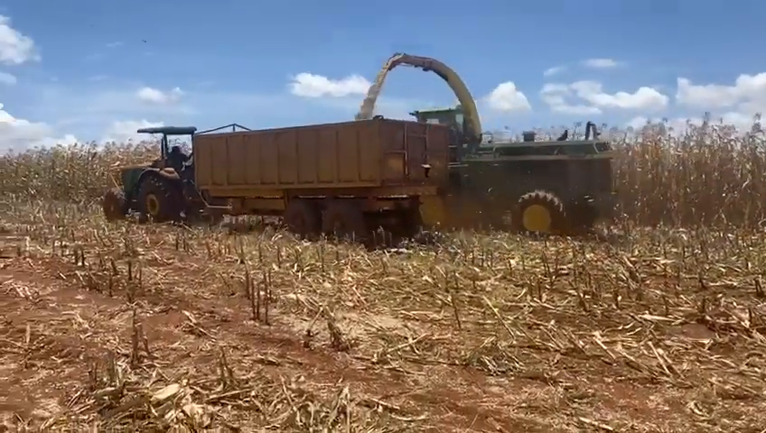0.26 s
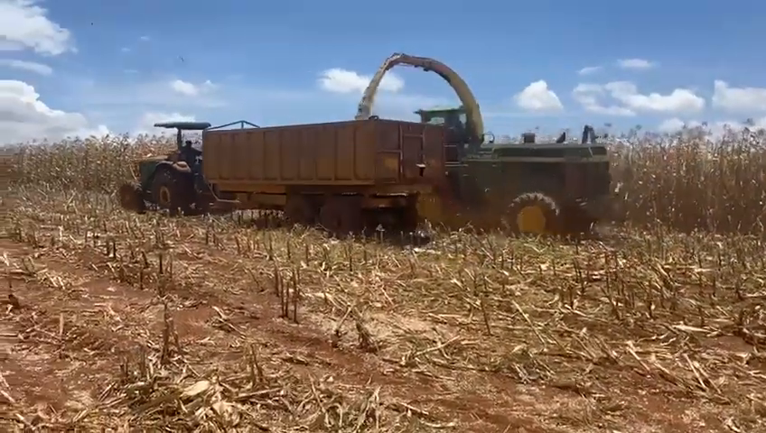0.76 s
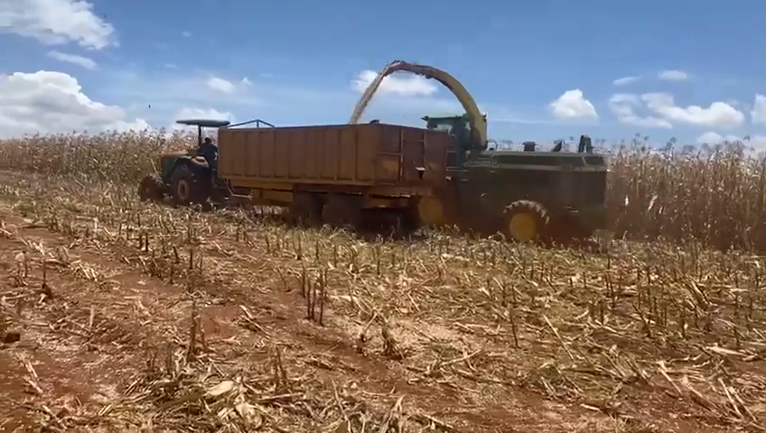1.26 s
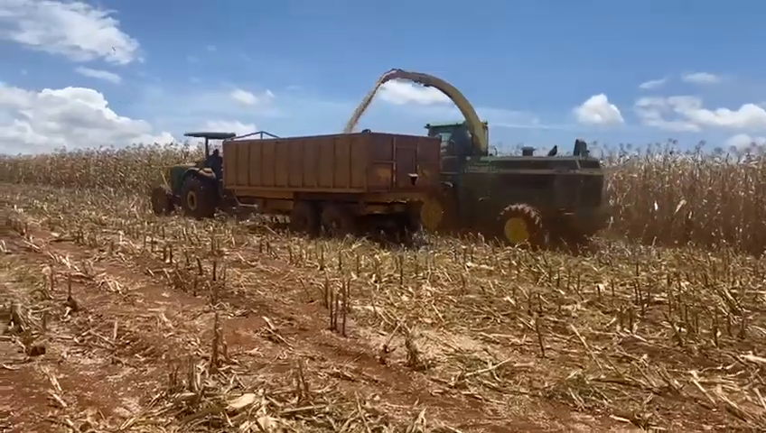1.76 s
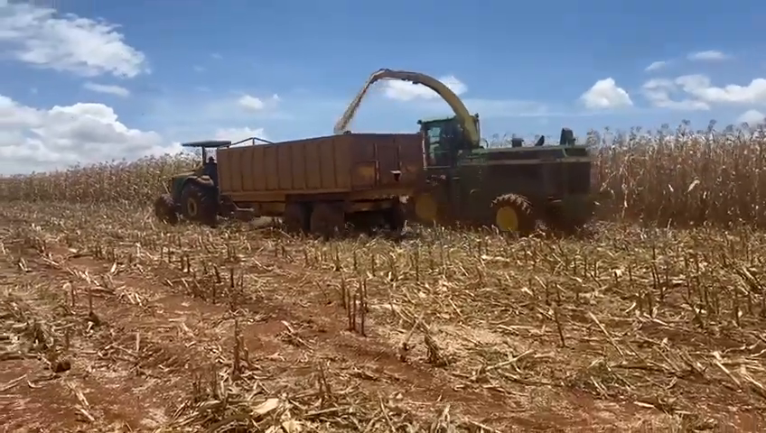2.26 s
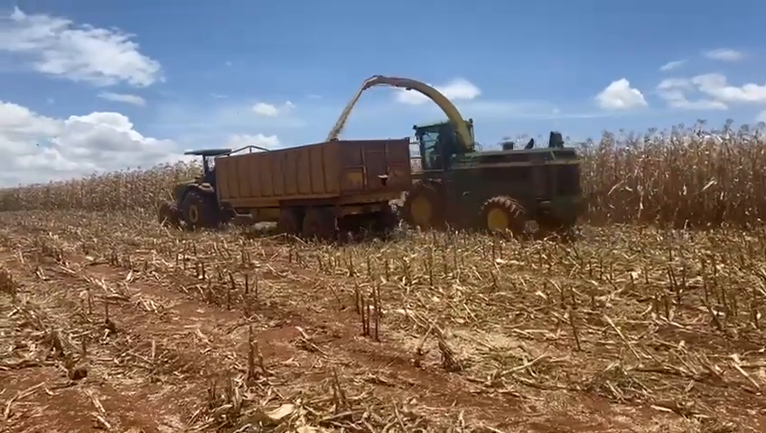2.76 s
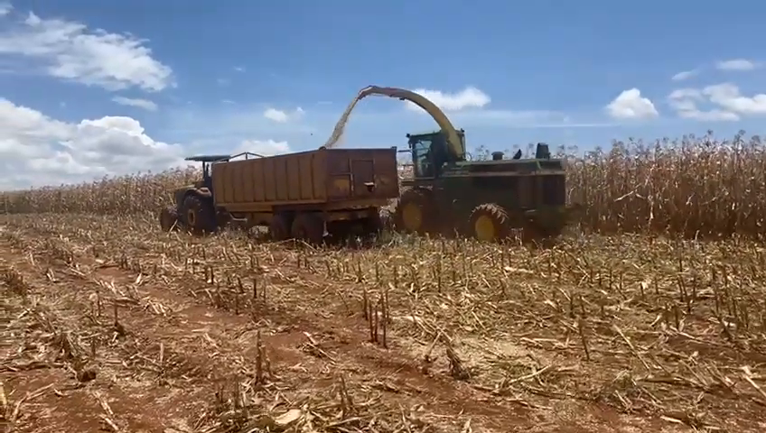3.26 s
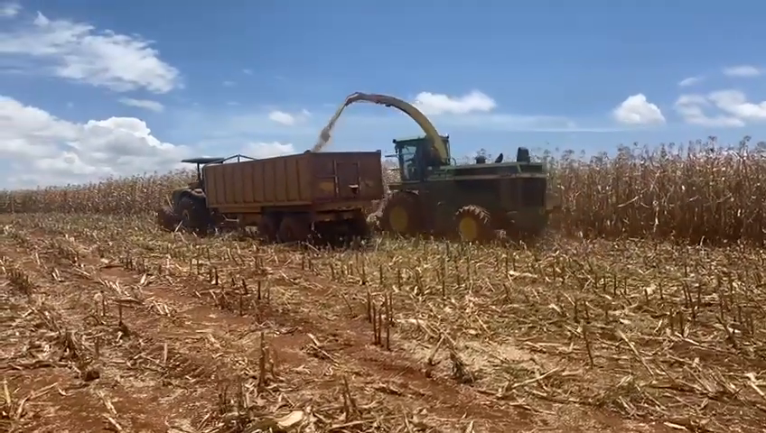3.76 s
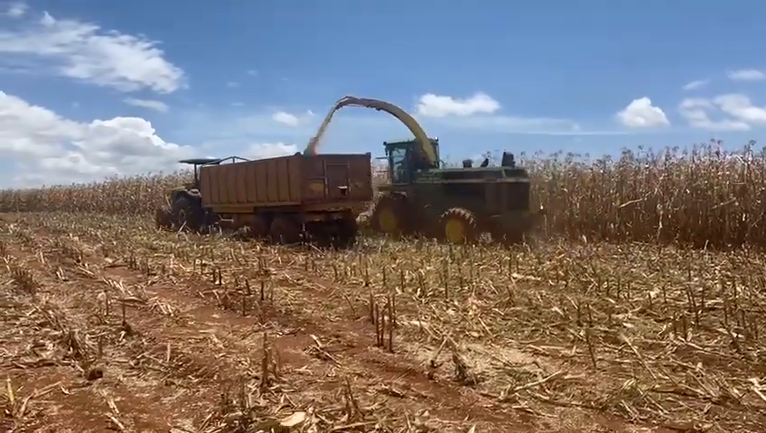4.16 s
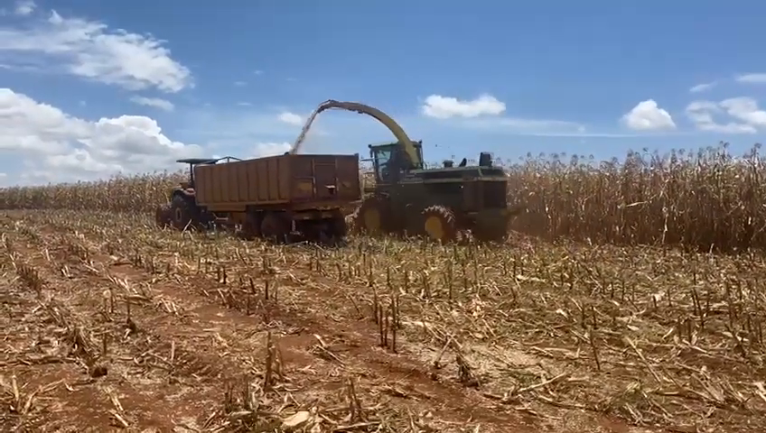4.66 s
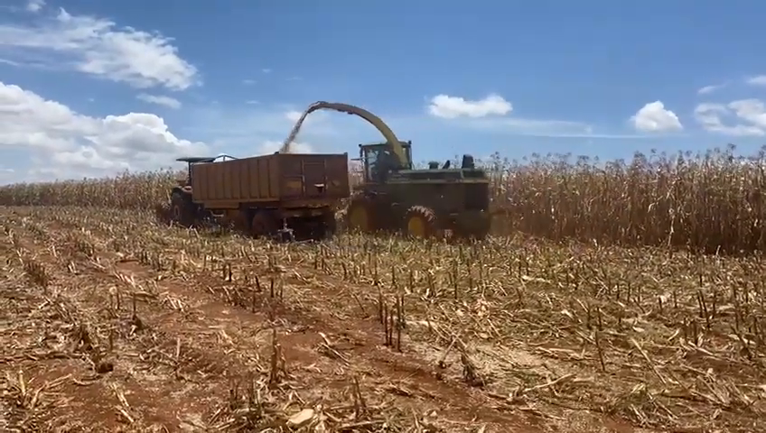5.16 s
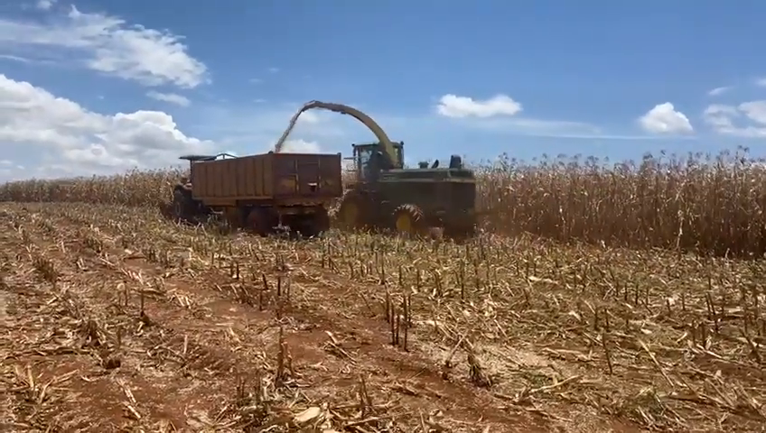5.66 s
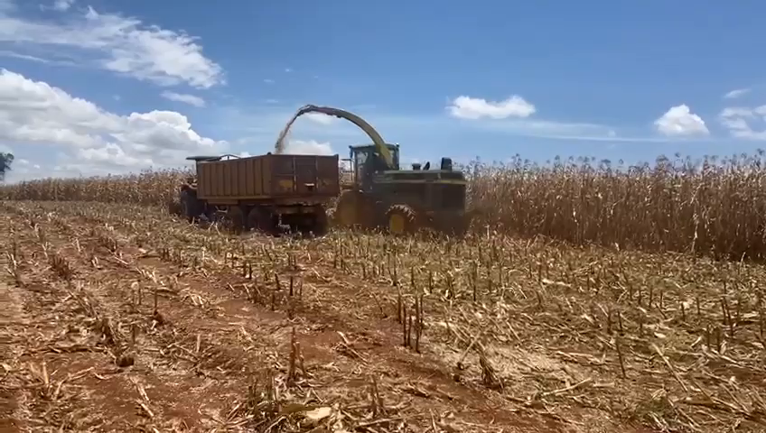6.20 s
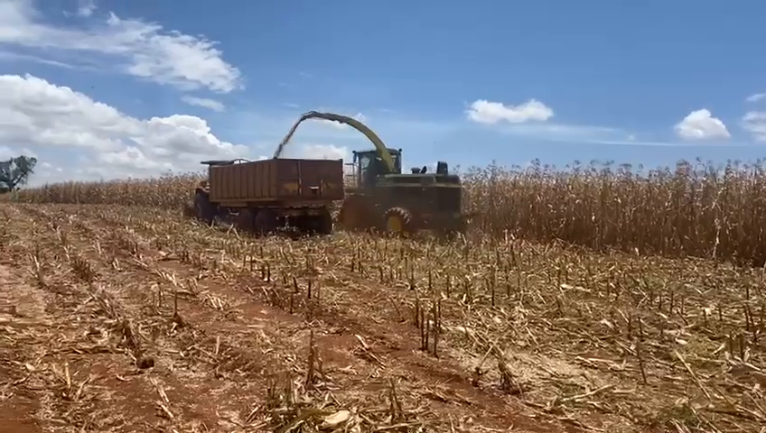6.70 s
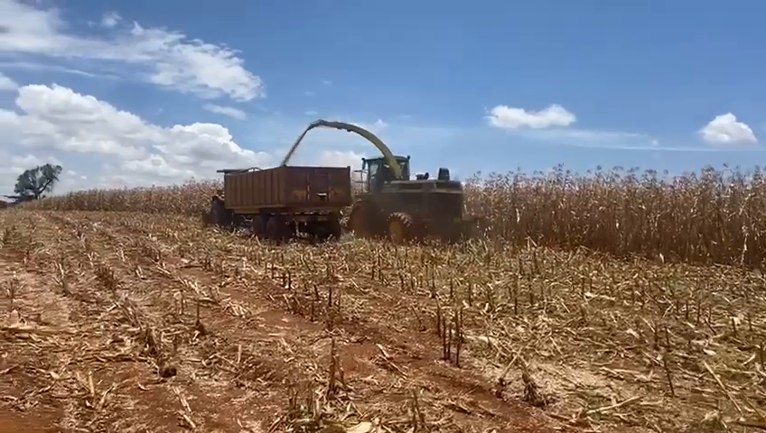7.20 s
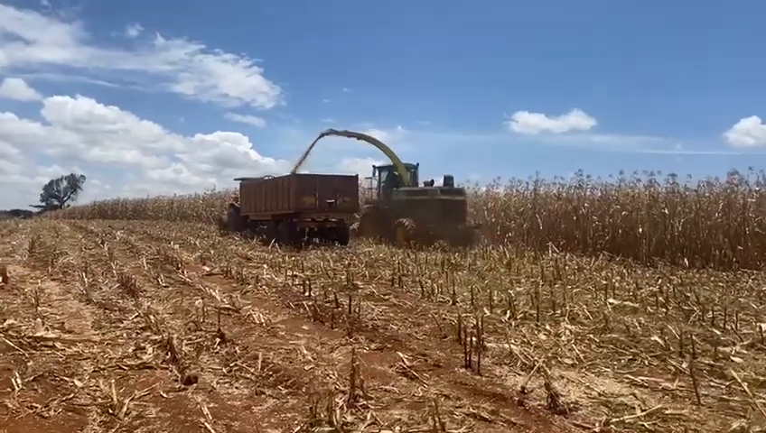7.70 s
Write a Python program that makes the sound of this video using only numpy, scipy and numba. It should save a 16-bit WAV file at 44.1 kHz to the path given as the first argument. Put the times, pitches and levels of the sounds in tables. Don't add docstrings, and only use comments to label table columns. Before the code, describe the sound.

Continuous, dense machine noise outdoors: a six-cylinder engine, rotating knives, blower air and flying chopped crop, with a second tractor engine humming low beneath. The pitch barely moves. The wavering gear song fades as the machines draw away, while a hollow drone and rumble grow. Dull trailer thumps and breeze on the phone's stereo microphone gather in the last second.

```python
import sys
import numpy as np
from scipy import signal
from scipy.fft import irfft
from scipy.io import wavfile
from scipy.ndimage import uniform_filter1d
from numba import njit

SR = 44100
rng = np.random.default_rng(int(sys.argv[2]) if len(sys.argv) > 2 else 0)


def materialize(psi):
    bounded = np.clip(np.atleast_2d(psi).T, -1, 1)
    quanta = np.round(bounded * 32767).astype(np.int16)
    wavfile.write(sys.argv[1], SR, quanta)


def amplitude_ratio(level_db):
    exponent = np.asarray(level_db, float) / 20
    return 10 ** exponent


N = 350154
CYCLE_ORDER = 12
CYLINDERS = 6

# (time [s], 12th order [Hz], exhaust [dB], drum [dB], effort [dB])
SHAFT_COURSE = [(0, 220.3, -41, -26.5, 1.8), (.35, 220, -32, -24.5, -1), (.9, 216.3, -35, -25, 0.5),
                (1.5, 217.1, -30, -24, 0.5), (2.1, 217.7, -32, -32.5, -0.5), (2.7, 218.2, -31, -28, 0.5),
                (3.1, 218.9, -46, -31.5, -.5), (3.5, 219.4, -40, -29, -1), (4.3, 220.6, -29.5, -26, -.6),
                (4.85, 221, -27.5, -22.5, .5), (5.3, 221.2, -25, -25, 0), (5.9, 220.7, -27, -25, -.5),
                (6.3, 219, -25.5, -28, -2), (6.65, 217.3, -24.5, -32, 2), (7, 216.9, -30.5, -30, 1.3),
                (7.3, 217, -24, -36.5, 0), (7.94, 216.7, -27.5, -35, -1)]


def columns(table):
    s, *rest = np.transpose(table)
    return [np.interp(np.arange(N) / SR, s, c) for c in rest]


def on_log(hz, table):
    f, v = np.transpose(table)
    return np.interp(np.log(hz), np.log(f), v)


def walk(rate):
    steps = np.repeat(rng.standard_normal(int(N / SR * rate) + 2), 8)
    steps = uniform_filter1d(uniform_filter1d(steps, size=8), size=8)
    return 1.35 * np.interp(np.arange(N) * (8 * rate / SR), np.arange(len(steps)), steps)


def swells(rows):
    t = np.arange(N) / SR
    return sum(top * np.exp(-((t - s) / np.where(t < s, rise, fall)) ** 2) for s, rise, fall, top in rows)


def glide(ends, span=(0, N / SR)):
    p = np.clip((np.arange(N) / SR - span[0]) / (span[1] - span[0]), 0, 1)
    return ends[0] + (ends[1] - ends[0]) * np.sin(np.pi * p / 2) ** 2


def unit(x):
    return x / np.sqrt(np.mean(x ** 2))


@njit
def svf(x, hz, width):
    y, b, l = np.empty(len(x)), 0., 0.
    for i in range(len(x)):
        g, k = np.tan(np.pi * hz[i] / SR), width / hz[i]
        v = (b + g * (x[i] - l)) / (1 + g * (g + k))
        b, l, y[i] = 2 * v - b, l + 2 * g * v, k * v
    return y


def band(x, hz, width):
    return svf(x, hz * np.ones(N), 1. * width)


def tone(hz, db, fade_db, wander):
    phase = 2 * np.pi * (np.cumsum(hz) / SR + rng.random()) + wander * walk(9)
    return np.sqrt(2) * amplitude_ratio(db + fade_db * walk(4)) * np.sin(phase)


def diesel():
    # (order, level [dB])
    steady_orders = [(2, -50.5), (3, -53), (4, -44.5), (5, -41), (6, -35.5), (7, -46), (10, -36.5),
                     (11, -42), (14, -37), (15, -50.5), (18, -42), (20, -41), (22, -43.5), (24, -46.5),
                     (25, -54), (26, -48), (48, -49)]
    # (time [s], rise [s], fall [s], change [dB])
    ninth = [
        (0, .3, 0.34, -3),
        (3, 0.34, .3, 5),
        (4.5, 0.5, 0.37, 5.5),
        (6.7, 0.72, .6, 7),
    ]
    thirteenth = [
        (0, .2, .2, -1),
        (3.8, 0.69, 0.46, -4),
        (7.35, .2, .3, -7),
    ]
    sixteenth = [
        (5.07, 1.4, 1.7, -18.5),
    ]
    nineteenth = [
        (.95, 0.48, 0.55, 17.4),
        (2.6, .15, 0.13, 16),
    ]

    hz, exhaust_db = columns(SHAFT_COURSE)[:2]
    cycle_hz = hz / CYCLE_ORDER
    strong_orders = [
        (12, exhaust_db),
        (9, -34 + swells(ninth)),
        (13, -32.5 + swells(thirteenth)),
        (16, -31 + swells(sixteenth)),
        (19, -46 + swells(nineteenth)),
    ]
    strong = sum(tone(k * cycle_hz, db, fade_db=0.85, wander=0.24) for k, db in strong_orders)
    weak = sum(tone(np.round(k) * cycle_hz, db, fade_db=2.0, wander=0.42) for k, db in steady_orders)
    return strong + weak, np.cumsum(cycle_hz) / SR


def rotors():
    # (time [s], rise [s], fall [s], change [dB])
    octave = [
        (.05, 0.27, 0.56, 6),
        (1.1, .4, 1.6, 14.5),
        (3.05, 0.27, 0.23, 5.6),
        (4.6, 0.55, .45, 8.5),
        (7.25, 0.34, 2.9, 15.6),
    ]
    # (time [s], rise [s], fall [s], change [dB])
    paddle_dip = [
        (2.15, .45, .45, -5),
    ]

    hz, _, knife_db, _ = columns(SHAFT_COURSE)
    knife_hz = 17.5 * hz / CYCLE_ORDER
    paddle_hz = 20.5 * hz / CYCLE_ORDER
    octave_db = -47.5 + swells(octave)
    receding_db = -1.22 * np.arange(N) / SR
    shade_db = glide((0, -12), (5, 5.2))
    paddle_db = -28.5 + receding_db + shade_db + swells(paddle_dip)
    drum = tone(knife_hz, knife_db, fade_db=0.5, wander=0.21)
    drum = drum + tone(2 * knife_hz, octave_db, fade_db=-1.0, wander=0.78)
    drum = drum + tone(3 * knife_hz, octave_db - 16, fade_db=3.5, wander=0.27)
    drum = drum + tone(4 * knife_hz, octave_db - 21, fade_db=0.0, wander=0.86)
    return drum + tone(paddle_hz, paddle_db, fade_db=1.0, wander=0.65)


def rumble_rise():
    return glide((-1, 0), (3, 3.5))


def loads():
    effort_share = [.4, 1.2, 0.35, 1]
    flutter_db = [1.95, 0.68, 1.3, 0.19]

    effort_db = columns(SHAFT_COURSE)[3]
    rumble, casing, fan, hiss = (share * effort_db + db * walk(5) for share, db in zip(effort_share, flutter_db))
    casing = casing + glide((0, -1.5), (1.5, 2))
    fan = fan + glide((-2.6, 0), (.7, 1.75))
    return rumble + rumble_rise(), casing, fan, hiss


def roar(turns, treble_db):
    load_hz = [70, 450, 1100, 4500]
    # (frequency [Hz], density [dB per Hz])
    sum_colour = [(18, -36), (30, -8.5), (161, -4), (270, -5), (311, -5.5), (392, -8), (1230, -14.5),
                  (1710, -19.5), (1880, -20), (3790, -27), (5630, -28.5), (7120, -30), (8000, -31),
                  (10400, -50.5), (17600, -120)]
    # (frequency [Hz], gain [dB])
    sum_top = [(7600, -2), (8200, -7), (8600, -22), (9000, -26.5), (9500, -16), (10000, -11), (10500, -9.5),
               (11300, -10), (11750, -16.5), (12050, -70)]
    # (frequency [Hz], density [dB per Hz])
    difference_colour = [(13, -43), (22, -13), (54, -17), (247, -9.5), (312, -13), (574, -6.5), (836, -5.5),
                         (1280, -2.5), (2140, -6), (2400, -10.5), (4420, -14), (6000, -12), (7800, -42),
                         (13200, -120)]
    # (frequency [Hz], gain [dB])
    difference_top = [(6000, 0.5), (6500, -5), (7100, -13), (7600, -4), (8600, 2.5), (9400, -3.5),
                      (10200, -4.5), (10700, -27), (11200, -47)]
    # (frequency [Hz], likeness [-1 to 1])
    lean = [(100, 0.0), (300, -.3), (900, 0.43), (2000, 0.2), (4000, 0.25), (9000, 0.11)]
    # (frequency [Hz], share of the difference [0-1])
    lag = [(700, 0.0), (1000, .3), (1450, 0.5), (1900, 0.022), (2400, 0.1), (3000, 0)]
    # (time [s], rise [s], fall [s], lift [dB])
    wads = [(.36, .05, 0.062, 2.5), (.65, 0.15, .07, 3), (.85, 0.088, 0.082, 1.5), (1.17, .12, .08, 1.5),
            (1.68, .16, .07, 6), (2.06, 0.13, 0.25, 3), (2.45, 0.043, .05, 3), (2.66, 0.1, 0.066, 3.5),
            (2.87, 0.12, 0.085, 2.5), (3.18, 0.11, 0.11, 3.8), (3.55, 0.078, .1, 3),
            (4.15, 0.074, 0.079, 1), (4.47, .07, .08, 2.5), (4.95, 0.064, 0.2, 2), (5.55, 0.14, 0.033, 2.5),
            (5.85, 0.067, 0.042, 1), (6.3, 0.16, 0.065, 2.5), (6.74, 0.094, 0.078, 7),
            (6.93, 0.065, 0.071, 1), (7.07, 0.018, 0.1, 6.5), (7.27, 0.07, 0.1, 4.5),
            (7.62, 0.15, 0.079, 4)]

    size = 2 ** 11 * 175
    hz = np.maximum(np.arange(size // 2 + 1) * SR / size, 1.)
    moves = loads()
    total = amplitude_ratio(on_log(np.minimum(hz, 8000), sum_colour) + on_log(hz, sum_top))
    apart = amplitude_ratio(on_log(np.minimum(hz, 6000), difference_colour) + on_log(hz, difference_top))
    throb = 0.72 * np.cos(2 * np.pi * turns) + 0.46 * np.cos(4 * np.pi * turns + 1)
    throb = throb + 0.42 * np.cos(2 * np.pi * CYLINDERS * turns)
    clumps = .5 * walk(24) + swells(wads) - 1.3
    mid, side = 0, 0
    for centre in 20 * 2 ** np.arange(0, 10, .5):
        shape = np.cos(np.pi * np.clip(np.log2(hz / centre), -.5, .5))
        one, other = rng.standard_normal((2, len(hz), 2)) @ [1, 1j] * shape
        like = np.clip(on_log(centre, lean), -.5, .5) + 1j * np.clip(on_log(centre, lag), -.85, .85)
        place = on_log(centre, list(zip(load_hz, range(4))))
        load_db = sum(max(1 - abs(place - k), 0) * db for k, db in enumerate(moves))
        high = np.clip(np.log2(centre / 800) / 2.8, 0, 1)
        gain = amplitude_ratio(load_db + high * (throb + clumps + 1.55 * walk(8)))
        mid = mid + gain * irfft(one * total, size)[:N]
        turned = amplitude_ratio(treble_db * (3300 < centre < 7400))
        partly_alike = like * one + np.sqrt(1 - abs(like) ** 2) * other
        side = side + gain * turned * irfft(partly_alike * apart, size)[:N]
    return amplitude_ratio(-21.5) * unit(mid), amplitude_ratio(-33.5) * unit(side)


def mesh():
    # (time [s], rise [s], fall [s], lift [gain])
    gear_swells = [
        (.55, 0.37, 0.39, 0.6),
        (1.05, 0.16, 0.17, 0.37),
        (1.65, 0.32, .2, 1.2),
        (2.2, .2, .5, 0.27),
        (3.45, .4, .38, .95),
        (4.4, 0.26, .4, 0.38),
    ]
    return 0.15 + swells(gear_swells)


def whine():
    ring = band(band(rng.standard_normal(N), 2250, 70), 2250, 70)
    return amplitude_ratio(-45.0 + 4.9 * walk(26)) * mesh() * unit(ring)


def tractor():
    # (frequency [Hz], level [dB])
    hum_lines = [(29.7, -52.5), (59.2, -34), (79.5, -40.5), (119, -35), (126, -43.5), (159.5, -43),
                 (174.5, -33.5)]
    rise_db = rumble_rise() - 0.3
    return sum(tone(np.full(N, 1. * hz), db + rise_db, fade_db=1.0, wander=0.97) for hz, db in hum_lines)


def knocks():
    # (time [s], peak [dB], pitch [Hz])
    blows = [
        (1.402, -17, 67.3),
        (2.299, -8, 118),
        (6.969, -7, 53.8),
        (7.007, -6, 161),
        (7.074, -6, 99.6),
        (7.194, -5, 75.4),
        (7.231, -4.5, 102),
        (7.629, -3.5, 113),
        (7.649, -4, 186),
    ]
    out, t = np.zeros(N + SR), np.arange(SR // 8) / SR
    for s, db, hz in blows:
        out[int(s * SR):][:len(t)] += amplitude_ratio(db - 5) * np.sin(2 * np.pi * hz * t) * np.exp(-t * hz / 0.92)
    return out[:N]


def surge():
    low = band(band(rng.standard_normal(N), 85, 90), 85, 90)
    rut = (7.15, .2, .22, 1)  # time, rise, fall [s], size
    return amplitude_ratio(-27 + 3 * walk(25)) * swells([rut]) * unit(low)


def breeze():
    # (time [s], rise [s], fall [s], lift [dB])
    gust_swells = [
        (.08, .1, .12, 10),
        (2.3, 0.22, .15, 5),
        (7.12, .1, 0.13, 13),
        (7.78, 0.11, .4, 23),
    ]
    db = -54.5 + 1 * np.arange(N) / SR + swells(gust_swells)
    gusts = [svf(rng.standard_normal(N), np.full(N, 55.), 90.) * amplitude_ratio(2.3 * walk(15)) for _ in range(2)]
    return amplitude_ratio(db) * np.array([unit(svf(g, np.full(N, 60.), 200.)) for g in gusts])


def bounce(x, ms, drift_ms):
    lag_samples = (ms + drift_ms * walk(.5)) * SR / 1000
    return np.interp(np.arange(N) - lag_samples, np.arange(N), x)


def field(x):
    # (time [s], rise [s], fall [s], lift [gain])
    spout_swells = [
        (.95, 0.18, 0.39, .15),
        (4.3, 0.54, .3, 0.5),
        (5.0, 0.16, 1.0, 1),
        (6.2, .2, 0.48, 0.43),
        (7.7, 0.42, .5, .3),
    ]
    # (time [s], rise [s], fall [s], lift [gain])
    chute = [
        (2.55, 0.25, .35, 0.55),
        (3.4, .3, .25, .7),
        (4.9, 0.65, .3, 0.37),
    ]
    # (time [s], rise [s], fall [s], depth [gain])
    low_dip = [
        (.1, .3, 0.48, -0.56),
        (2.4, 0.93, 2.8, 0.33),
    ]
    # (time [s], rise [s], fall [s], lift [gain])
    whistle = [
        (1.02, .2, 0.3, 0.7),
        (3.1, 0.11, 0.17, 0.57),
    ]

    x = x + 0.11 * bounce(x, 2.3, drift_ms=0.13) + 0.18 * bounce(x, 6.5, drift_ms=.3)
    dip_hz, dip = glide((1400, 1690), (0.18, 4.5)), glide((0.11, 0.36), (0.18, 4.5))
    second, high = glide((.05, .33), (2.3, 4.2)), glide((.4, 0.092))
    x = x - dip * band(x, dip_hz, 276) - second * band(x, 2575, 170) - high * band(x, 5640, 1400)
    x = x - swells(low_dip) * band(x, 1460, 280) - 0.19 * band(x, 787, 200)
    x = x + swells(whistle) * band(x, 3880, 220)
    hold = glide((0.11, 0.58), (3.9, 5.8)) * (band(x, 533, 110) - .4 * band(x, 350, 120))
    x = x + swells(chute) * band(x, 2750, 150) + hold
    gear_hz = glide((1910, 2354), (.1, 1.2)) - 20 * np.arange(N) / SR + 45 * walk(12)
    gear = mesh() * amplitude_ratio(1.5 * walk(18))
    gear_song = gear * band(band(x, gear_hz, 280), gear_hz, 280)
    return x + gear_song + swells(spout_swells) * band(x, np.linspace(3900, 3350, N), 800)


def scene():
    # (time [s], turn away [0-1])
    heading = [(0, .3), (.8, 0.06), (3, 0.07), (4.2, .7), (5.6, 1.1), (6.4, .85), (7.94, .8)]
    turn, = columns(heading)
    engine, turns = diesel()
    mid, side = roar(turns, -6.5 * turn)
    mid = field(mid) + whine()
    lines = engine + rotors() + tractor() + knocks() + surge()
    lean_lines, lean_hold = glide((-0.1, -0.029), (1.0, 1.8)), glide((0, -.13), (4.6, 6.4))
    lean_low, lean_high = glide((0, -0.18), (.1, 1.3)), glide((.4, 0.095), (.6, 5.2))
    side = side + lean_lines * band(lines, 300, 400) + lean_hold * band(mid + lines, 600, 350)
    side = side + lean_low * band(band(mid, 1150, 600), 1150, 600)
    side = side + lean_high * band(band(mid, 2760, 2200), 2760, 2200)
    return mid + lines + side * np.array([[1], [-1]]) + breeze()


def thin(pair):
    # (frequency [Hz], sum [dB], difference [dB])
    masked = [(100, -40, -30), (500, -30, -24), (1500, -14, -19), (3000, -10, -11), (5800, -6, -9),
              (7500, -7.5, -8), (9000, -6, -8), (11000, -4.5, -6), (11900, -3, -3)]
    both = np.array([pair[0] + pair[1], pair[0] - pair[1]]) / 2
    hz, _, z = signal.stft(both, SR, window="cosine", nperseg=2048, noverlap=1024)
    power = (abs(z[:, :1024]) ** 2).reshape(2, 128, 8, -1).mean(axis=2)
    around = uniform_filter1d(power.sum(axis=0), size=9, axis=0)
    around = around * amplitude_ratio(4 * rng.standard_normal(power.shape))
    edges, *under_db = np.transpose(masked)
    share = np.array([amplitude_ratio(2 * on_log(hz[4::8], list(zip(edges, db)))) for db in under_db])
    threshold = share[:, :, None] * around
    z[:, :1024] *= np.repeat(power > threshold, 8, axis=1)
    z[:, :1024] *= abs(z[:, :1024]) ** 2 > np.repeat(amplitude_ratio(2) * threshold, 8, axis=1)
    mid, side = signal.istft(z, SR, window="cosine", nperseg=2048, noverlap=1024)[1][:, :N]
    return np.array([mid + side, mid - side])


def band_limit(x):
    return signal.sosfilt(signal.butter(12, 12810, fs=SR, output="sos"), x)


def record(dry):
    heard = signal.sosfilt(signal.butter(2, 32, "highpass", fs=SR, output="sos"), dry)
    mix = thin(heard)
    return band_limit(mix)


dry = scene()
out = record(dry)
materialize(out)
```